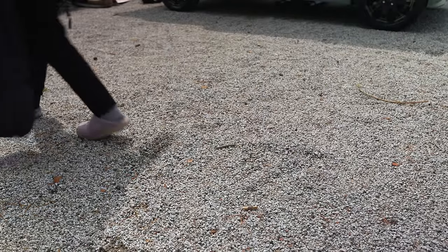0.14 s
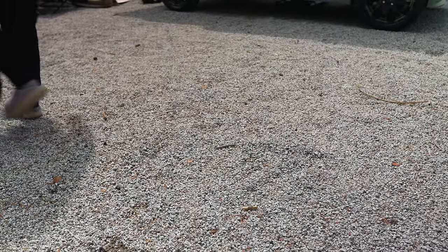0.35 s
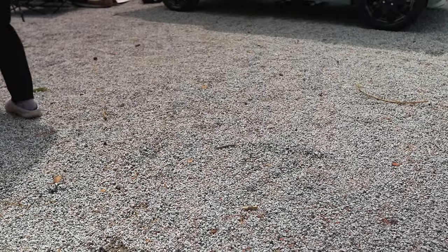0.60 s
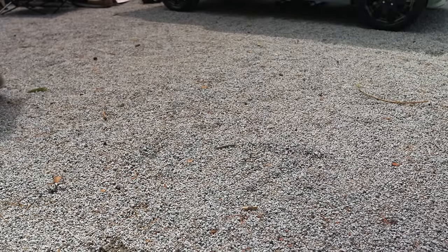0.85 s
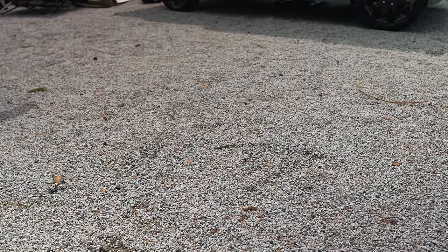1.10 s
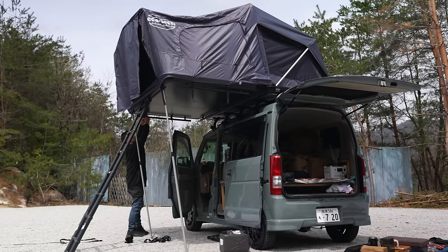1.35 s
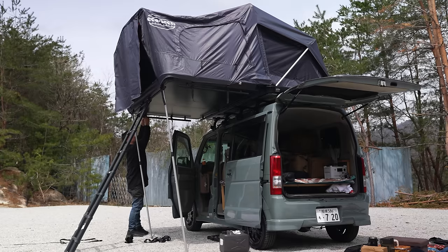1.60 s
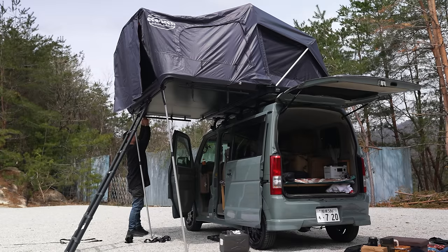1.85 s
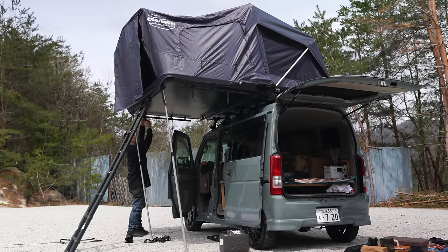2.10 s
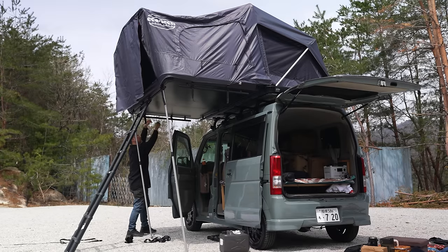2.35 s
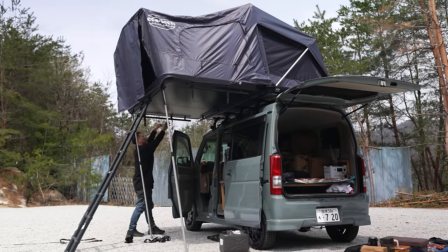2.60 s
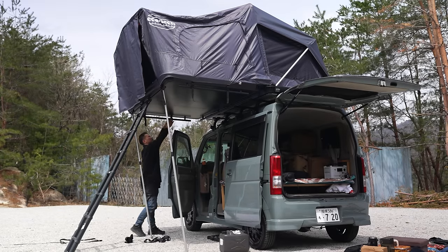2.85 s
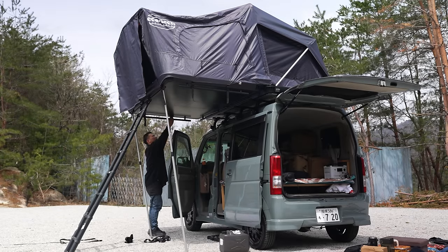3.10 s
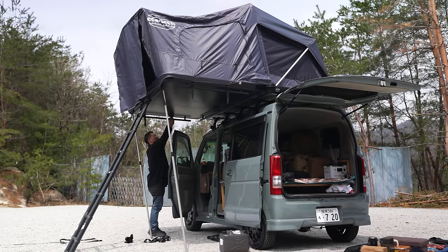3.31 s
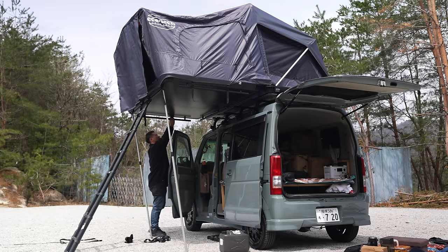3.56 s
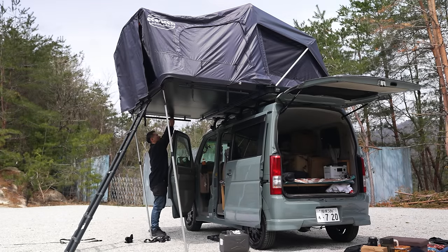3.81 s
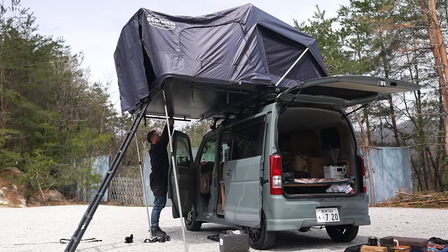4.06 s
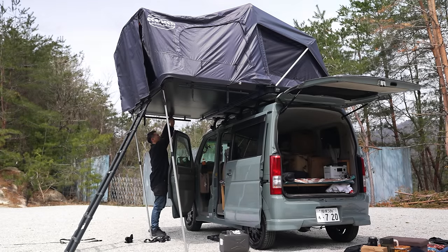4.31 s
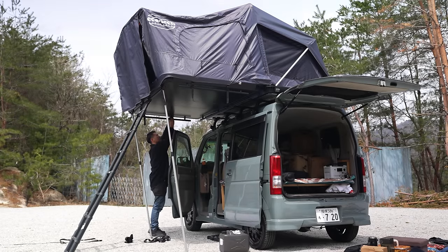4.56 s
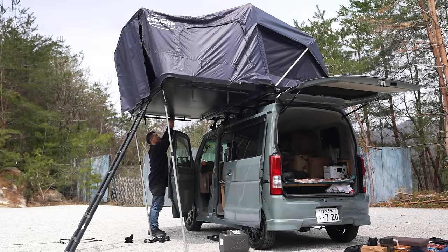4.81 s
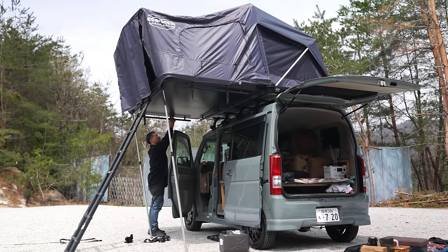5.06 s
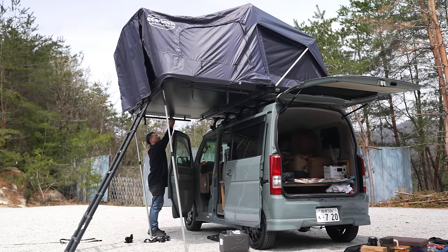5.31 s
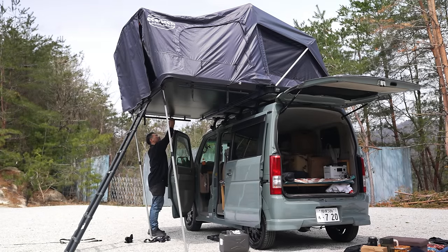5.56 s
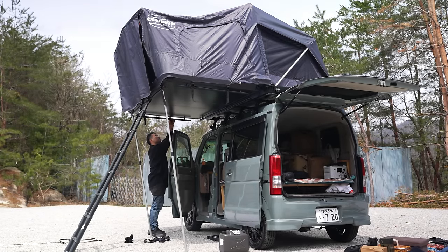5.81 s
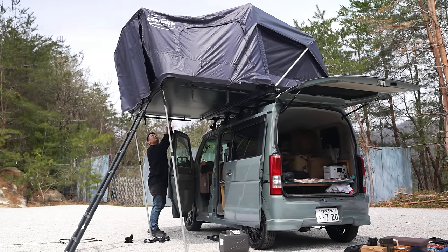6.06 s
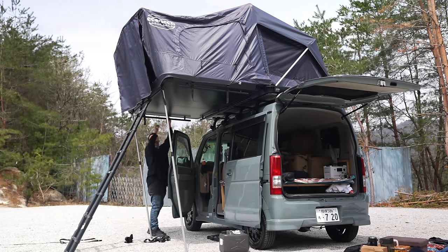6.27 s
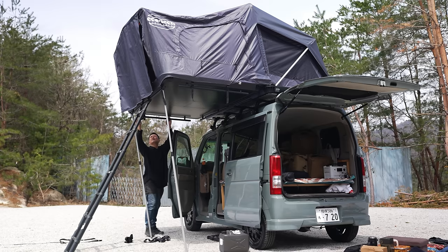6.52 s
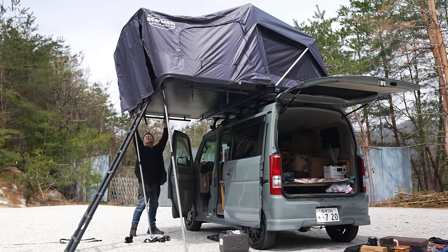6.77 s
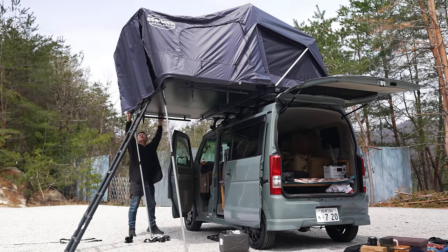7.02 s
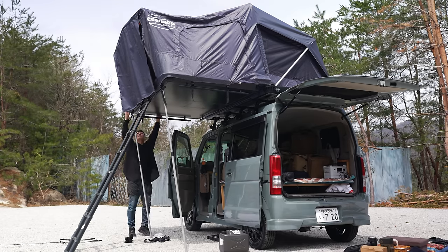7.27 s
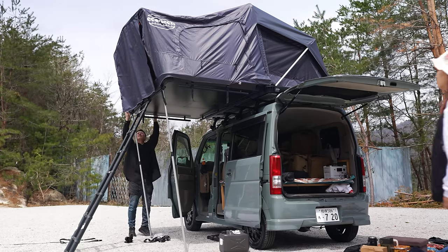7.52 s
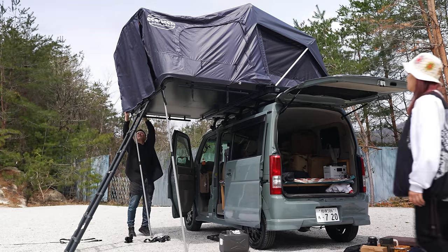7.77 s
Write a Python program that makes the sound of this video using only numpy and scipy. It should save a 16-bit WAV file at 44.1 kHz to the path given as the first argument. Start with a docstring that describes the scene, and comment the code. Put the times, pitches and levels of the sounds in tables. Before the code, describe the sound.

Gravel footsteps and a thumping bag end abruptly, followed by hollow pole knocks, tiny bright ticks, shifting stones and brief birdsong over faint outdoor hiss.

```python
"""Shoes crunch over gravel and a carried bag thumps, until a clatter is cut short at about 1.4 s.
Then hollow metal tent poles knock and ring, a small catch ticks, feet shift on the stones and birds call.
Under it all lies far air noise with a wavering low hum.
Stones, gear rattle, hiss and cracks are shaped noise; poles, bag and catch are damped sines;
birds are gliding sines."""
import sys
import numpy as np
from scipy import signal
from scipy.fft import rfft, irfft, next_fast_len
from scipy.io import wavfile
from scipy.ndimage import uniform_filter1d, map_coordinates

SR = 44100
rng = np.random.default_rng(int(sys.argv[2]) if len(sys.argv) > 2 else 0)


def put_to_file(sound):
    """Save the sound as 16-bit audio at rate SR, in the file named by the first command-line argument."""
    columns = np.atleast_2d(sound).T  # one column per channel
    safe = np.clip(columns, -1, 1)
    whole_steps = np.round(safe * 32767)
    wavfile.write(sys.argv[1], SR, whole_steps.astype(np.int16))


def ratio_of_db(decibels):
    """Turn decibels (scalar or array-like) into linear amplitude factors; 0 dB maps to 1."""
    return 10 ** (np.asarray(decibels, float) / 20)


N = 347816
TIME = np.arange(N) / SR
CUT_S = 1.4068  # the edit: earlier steps, early rattles and the clatter stop here


def unit(x):
    """Scale to rms 1."""
    return x / np.sqrt(np.mean(x ** 2) + 1e-20)


def peaked(x):
    """Scale to peak 1."""
    return x / np.abs(x).max()


def wobble(rate):
    """A smooth random curve, with rate random points a second."""
    points = rng.standard_normal(int(N * rate / SR) + 4)
    return map_coordinates(points, [TIME * rate])


def coloured(x, spectrum):
    """Give x the (Hz, dB) spectrum in place of its own, at rms 1."""
    size = next_fast_len(N + 8192)
    bins = rfft(x, size)
    hz, db = np.transpose(spectrum)
    own = np.sqrt(np.abs(uniform_filter1d(np.abs(bins) ** 2, size=1500))) + 1e-9
    bin_hz = np.fft.rfftfreq(size, 1 / SR)
    wanted = ratio_of_db(np.interp(np.log(bin_hz + 1), np.log(hz), db))
    return unit(irfft(bins / own * wanted, size)[:N])


def ring(hz, t60, length, attack):
    """A damped sine with a soft start; t60 is the time to fall 60 dB (all times in seconds)."""
    t = np.arange(int(length * SR)) / SR
    return np.sin(2 * np.pi * hz * t) * ratio_of_db(-60 * t / t60) * (1 - np.exp(-t / attack)) ** 2


def burst(t60, lo_hz, hi_hz, rise):
    """A short crack or thud: band noise that rises and dies away."""
    t = np.arange(SR // 10) / SR
    band = signal.butter(2, [lo_hz, hi_hz], "band", fs=SR, output="sos")
    noise = unit(signal.sosfilt(band, rng.standard_normal(len(t))))
    return noise * ratio_of_db(-60 * t / t60) * (1 - np.exp(-t / rise))


def add(track, s, sound):
    """Mix sound into track at s seconds."""
    part = track[round(s * SR):][:len(sound)]
    part += sound[:len(part)]


def echoes(x, t60, delay):
    """Scattered returns from the van, ground and trees: x smeared by dying noise after a delay."""
    dying = rng.standard_normal(SR // 2) * ratio_of_db(-60 * TIME[:SR // 2] / t60)
    tail = np.pad(dying, (int(delay * SR), 0))
    return signal.fftconvolve(x, tail / np.linalg.norm(tail))[:N]


# Colour of the far hiss. Each row: frequency in Hz, relative strength in dB per Hz.
AIR_SPECTRUM = [(18, -78), (30, -29), (68, -15), (93, -8), (165, -1.5), (383, -1.5), (648, -1), (720, -1),
                (1580, -5.5), (5160, -21.5), (10800, -31.5), (14800, -37), (16000, -38)]


def air():
    """Far hiss whose level drifts, and a narrow band of noise near 100 Hz that makes a wavering hum."""
    hiss = coloured(rng.standard_normal(N), AIR_SPECTRUM)
    hum = coloured(rng.standard_normal(N), [(20, -48), (75, -36), (92, -6.0), (104, 6.0), (120, -40),
                                            (200, -62), (20000, -120)])
    hiss_db = -46.5 + 0.9 * wobble(1.392)
    hum_db = -59 + 1.5 * wobble(1.5)
    return ratio_of_db(hiss_db) * hiss + ratio_of_db(hum_db) * hum


# Far calls. Each row: start in seconds, length in seconds, starting pitch in Hz, level before smearing in dB.
FAR_CALLS = [(0.175, 0.1, 4860, -41), (0.826, 0.078, 3380, -42), (2.33, 0.09, 3900, -57),
             (3.86, 0.18, 3800, -53)]


def far_birds():
    """Faint whistles deep in the wood, heard only as their smeared echoes."""
    out = np.zeros(N)
    for s, length, hz, db in FAR_CALLS:
        t = np.arange(int(length * SR)) / SR
        whistle = np.sin(2 * np.pi * hz * t * (1 + 0.22 * t))  # the pitch creeps up
        add(out, s, ratio_of_db(db) * np.hanning(len(t)) * whistle)
    return echoes(out, t60=0.22, delay=0)


# The song, one list a note. Each row of a note: time in seconds, pitch in Hz.
SONG_NOTES = [
    [(4.095, 5140), (4.111, 6470), (4.125, 5920), (4.148, 5860), (4.155, 4830), (4.172, 4550),
     (4.182, 5680), (4.188, 4810), (4.196, 4320), (4.203, 4930), (4.21, 4400), (4.26, 4080)],
    [(4.334, 4000), (4.352, 5500), (4.365, 5000), (4.38, 4720), (4.398, 4810), (4.411, 5340)],
    [(4.438, 8360), (4.442, 7300), (4.448, 6700), (4.454, 7670), (4.464, 5740), (4.471, 7120),
     (4.477, 4400), (4.484, 2760)],
]
# How each note changes in loudness. Each row: first level in dB, last level in dB.
NOTE_SWELLS = [(-50, -34.5), (-41, -30), (-31, -33)]


def bird():
    """Gliding whistles that linger among the trunks: sines that follow the drawn pitch lines."""
    edge_s = 0.0086  # fade at both ends of a note
    out = np.zeros(N)
    for note, swell_db in zip(SONG_NOTES, NOTE_SWELLS):
        times, pitches = np.transpose(note)
        hz = uniform_filter1d(np.interp(TIME, times, pitches), size=90)
        start, end = times[0], times[-1]
        edge = np.clip(np.minimum(TIME - start, end - TIME) / edge_s, 0, 1)
        level = ratio_of_db(np.interp(TIME, [start, end], swell_db))
        out += edge * level * np.sin(2 * np.pi * np.cumsum(hz) / SR)
    return out + ratio_of_db(-10.0) * echoes(out, t60=0.45, delay=0.014)


# Thumps of the bag. Each row: start in seconds, level in dB.
BAG_THUMPS = [(0.488, -16.5), (0.983, -30), (7.078, -41.5)]
# Ways the bag vibrates. Each row: pitch in Hz, level relative to the thump in dB, time to fall 60 dB in seconds.
BAG_MODES = [(85.8, -7, 0.77), (102, 1.5, 0.53), (163, -10, 0.3), (294, 7.5, 0.079), (355, 9, 0.089)]


def bag():
    """The soft load swings against a leg: low damped modes, of which the close pair beats."""
    rise_cycles = 0.77  # each mode swells over about this many of its own cycles
    out = np.zeros(N)
    for s, db in BAG_THUMPS:
        for hz, mode_db, t60 in BAG_MODES:
            add(out, s, ratio_of_db(db + mode_db) * ring(hz, t60, .6, rise_cycles / hz))
    return out


def clatter():
    """A first touch rumbles, then the blow: broad noise over a dull thud, stopped by the cut."""
    touch_s, blow_s, blow_hold_s = 1.3845, 1.398, .003
    touch_db, blow_db, after_db = (-32, -28), (-6, -10), (-42, -20.5)  # (sharp, dull)
    stage = np.digitize(TIME, [touch_s, blow_s, blow_s + blow_hold_s, CUT_S])
    gains = np.pad(ratio_of_db(np.array([touch_db, blow_db, after_db])), ((1, 1), (0, 0)))  # silent before and after
    sharp_gain, dull_gain = uniform_filter1d(gains[stage].T, size=24, axis=1)
    sharp = coloured(rng.standard_normal(N), [(300, -13.0), (3000, 0), (9000, -2.5), (15500, -5.0), (16200, -66)])
    dull = coloured(rng.standard_normal(N), [(20, -22), (250, 0), (700, -2), (2000, -12), (6000, -40)])
    return sharp_gain * sharp + dull_gain * dull


# Ticks of the catch. Each row: start in seconds, peak level in dB, base pitch in Hz.
CATCH_TICKS = [(1.671, -22, 6460), (2.1066, -35, 10800), (2.268, -25, 9350), (2.4618, -25, 9200),
               (2.6547, -24, 9700), (2.8533, -23.5, 9930), (3.2897, -27, 6600), (3.485, -26, 9500),
               (3.7309, -25, 9300), (3.9604, -33, 9630), (4.155, -23, 5950), (4.5985, -24.5, 9250),
               (4.8888, -36, 7800), (6.2597, -32, 10800), (6.49, -33, 10900), (6.5337, -29.5, 9720)]


def catch():
    """A bright, very short tick of three damped partials, with a brief rattle of echoes behind it."""
    partials = [(0.98, 0.59, 0.0012), (0.7, 0.41, 0.0012), (1.42, 0.23, 0.0014)]  # (times base pitch, share, t60 s)
    out = np.zeros(N)
    for s, db, hz in CATCH_TICKS:
        tick = sum(share * ring(ratio * hz, t60, .01, .0001) for ratio, share, t60 in partials)
        add(out, s, ratio_of_db(db) * peaked(tick))
    return out + ratio_of_db(-6.0) * echoes(out, t60=0.044, delay=0.0016)


# Knocks on the poles. Each row: time in seconds, peak level of the tone in dB, pitch of the air column in Hz,
# time to fall 60 dB in seconds, crack level relative to that peak in dB.
POLE_KNOCKS = [(1.892, -16.5, 519, 0.096, -4.5), (1.907, -2.5, 730, 0.027, -3),
               (3.072, -31.5, 623, 0.039, -8), (3.114, -24, 616, 0.019, -7), (3.219, -27, 604, 0.048, -7),
               (3.253, -28.5, 575, 0.051, -15), (3.34, -29, 598, 0.029, -11), (3.356, -36, 620, .041, -5),
               (3.373, -28, 605, .03, -8), (3.417, -29, 597, .048, 1), (3.446, -13, 610, 0.017, -16),
               (3.464, -27.5, 627, .063, -15), (3.523, -30, 590, 0.03, -8), (3.738, -30, 606, 0.054, 0),
               (3.972, -7, 603, 0.02, -7.5), (4.004, -24.5, 646, 0.047, -2), (4.025, -19, 580, 0.025, -8),
               (4.139, -23.5, 552, 0.18, 0.5), (4.172, -11, 543, 0.11, 1), (4.199, -17.5, 555, 0.071, -5),
               (4.226, -16, 582, 0.053, -6), (4.249, -20.5, 556, 0.064, -6), (4.244, -20, 332, 0.05, -4),
               (4.377, -29.5, 443, .031, 5), (4.515, -33, 560, 0.21, -3), (4.544, -22, 580, 0.024, -5),
               (4.568, -27, 536, .049, -15), (4.821, -32, 655, 0.065, 4), (4.892, -32.5, 540, .05, -6),
               (5.095, -28.5, 643, .035, -1), (5.124, -28, 564, 0.039, -16), (5.155, -31, 550, 0.043, -16),
               (5.287, -35.5, 567, 0.063, -12), (5.565, -32.5, 603, 0.1, -20),
               (5.599, -31, 580, 0.035, -16), (5.662, -27.5, 572, 0.29, -19), (5.698, -13, 570, 0.057, -11),
               (5.711, -13, 544, 0.12, -7), (5.734, -3.5, 558, 0.031, -9.5),
               (7.862, -19.5, 580, 0.049, 6.5)]
# Metal on metal. Each row: start in seconds, lowest mode level in dB, upper modes level in dB,
# crack level in dB, struck place along the pole from 0 to 1.
POLE_CLANGS = [(1.907, -42, -22, -16.5, 0.3), (5.7, -45, -43, -36, 0.4), (5.731, -17, -25.5, -20.5, 0.4),
               (7.863, -8, -18, -10.5, .255)]
# Ways the pole wall rings. Each row: pitch in Hz, level relative to the upper modes level in dB
# (not used for the first row, the lowest mode), time to fall 60 dB in seconds.
WALL_MODES = [(552.7, 0, 0.69), (1071, -4, 0.17), (1690, 2, 0.06), (2244, 5.5, 0.12), (2950, 8, 0.04),
              (3600, 7, 0.028), (4270, 6, 0.027), (4840, -19.5, 0.054), (6700, -3, 0.087),
              (6930, -7, 0.078), (7180, 8, 0.048), (8200, -6, 0.014), (8070, 13, 0.045)]


def poles():
    """A knock swells in the air column over a thud and crack; a clang rings wall modes set by the struck place."""
    thud_db = -8  # relative to the peak of a knock
    out = np.zeros(N)
    for s, db, hz, t60, crack_db in POLE_KNOCKS:
        add(out, s - .003, ratio_of_db(db) * peaked(ring(hz, max(t60, .01), .3, 0.0035)))
        add(out, s - .002, ratio_of_db(db + thud_db) * burst(0.093, lo_hz=188, hi_hz=570, rise=0.0068))
        add(out, s, ratio_of_db(db + crack_db) * burst(.032, lo_hz=740, hi_hz=2230, rise=0.0035))
    lowest_hz, _, lowest_t60 = WALL_MODES[0]
    for s, low_db, upper_db, crack_db, place in POLE_CLANGS:
        add(out, s, ratio_of_db(crack_db) * burst(0.032, lo_hz=2000, hi_hz=7800, rise=0.00066))
        add(out, s, ratio_of_db(low_db) * ring(lowest_hz, lowest_t60, .5, .001))
        for hz, db, t60 in WALL_MODES[1:]:
            waves = 6 * np.sqrt(hz / lowest_hz)  # bending waves along the pole grow as the root of pitch
            tone = ring(hz, t60, .12, .0007)
            slow_noise = unit(uniform_filter1d(rng.standard_normal(len(tone)), size=200))
            flutter = unit(1.76 + slow_noise)  # loose joints
            add(out, s, ratio_of_db(upper_db + db) * np.sin(np.pi * waves * place) * flutter * tone)
    return out + ratio_of_db(-18) * echoes(out, t60=0.22, delay=.006)


def grains(count, size, hz, spread, cycles, scatter_db):
    """Small knocks at random times: short damped sines of log-normal pitch, a few much louder."""
    start = rng.integers(0, N, count)
    pitch = hz * np.exp(spread * rng.standard_normal(count))
    loudness = ratio_of_db(scatter_db * np.minimum(rng.exponential(1, count), 5))
    turns = np.clip(pitch, 100, 16000)[:, None] * np.arange(size) / SR
    shapes = loudness[:, None] * np.sin(2 * np.pi * turns) * np.exp(-turns / cycles)
    places = start[:, None] + np.arange(size)
    return unit(np.bincount(places.ravel(), shapes.ravel(), minlength=N)[:N])


def weight(s, hold):
    """Envelope of a load that lands fast, holds and settles slowly; the cut stops the early ones."""
    land_s, settle_db_per_s = 0.0098, 155
    landing = 1 - (s > 0) * np.exp(-np.maximum(TIME - s, 0) / land_s)  # a step at 0 s is already down
    settling = ratio_of_db(-settle_db_per_s * np.maximum(TIME - s - land_s - hold, 0))
    return landing * settling * ((s > CUT_S) | (TIME < CUT_S))


# Feet landing or shifting. Each row: start in seconds, hold in seconds, crunch level in dB,
# then grit level and sand level, both relative to the crunch in dB.
FOOTSTEPS = [(0, 0.088, -27, -9, -17.5), (0.111, 0.16, -26.5, -7, -17.5), (0.308, 0.079, -38, 3.5, -1.5),
             (.44, 0.19, -32, -7.5, -14), (0.634, 0.13, -24, -8, -18.5), (.78, 0.035, -26, -6, -8),
             (.84, 0.023, -37.5, -15, 0.5), (.92, 0.31, -34.5, -9.5, -12.5), (1.14, 0.094, -29, -13, -22),
             (1.208, 0.061, -28.5, -5, -14.5), (1.3, .1, -39.5, -3, -4), (1.41, 0.036, -42, -28, -36),
             (1.93, 0.26, -42, -13, -23), (2.639, 0.23, -32, -21, -20.5), (2.95, 0.24, -41.5, -24, -25),
             (3.129, 0.047, -24.5, -25, -17.5), (3.21, 0.065, -37.5, -33, -32),
             (3.34, 0.16, -42.5, -16, -25), (4.14, 0.067, -41, -5, -18), (4.3, 0.082, -43.5, -7, -24),
             (4.5, 0.092, -43.5, -7, -23), (4.72, 0.4, -47.5, -17, -25), (5.058, 0.013, -35.5, -11, -20),
             (5.85, .13, -44, -23, -28), (6.01, .06, -35, -30, -29), (6.089, 0.086, -27, -26, -29.5),
             (6.25, 0.19, -38.5, -34, -24), (6.5, 0.55, -42.5, -28, -21), (6.808, 0.011, -30, -18, -13.5),
             (6.86, 0.27, -33.5, -14.5, -21.5), (7.137, .001, -35.5, -2, -20),
             (7.191, 0.096, -28.5, -20.5, -13.5), (7.33, 0.18, -30, -20, -15),
             (7.52, 0.14, -24, -22.5, -20.5), (7.68, 0.14, -31.5, -14.5, -18)]
# Faint stirring between steps, one row: crunch, grit, sand and low rattle levels in dB.
STIRRING_DB = -52.5, -60, -68, -51.5
# Spells of extra low rattle from the gear, often along with a step or knock.
# Each row: start in seconds, hold in seconds, level in dB.
RATTLE_SPELLS = [(1.02, .03, -37), (1.904, 0.015, -30), (3.128, 0.034, -34), (4.17, 0.034, -31),
                 (4.833, 0.1, -44.5), (5.696, 0.032, -45), (7, 0.12, -34.5), (7.18, 0.072, -29.5)]


def footfalls():
    """Gain of crunch, grit, sand and low gear rattle, summed by power over all steps and rattle spells."""
    rattle_db = -12  # relative to the crunch
    power = np.tile(ratio_of_db(np.array(STIRRING_DB))[:, None] ** 2, N)
    for s, hold, db, grit_db, sand_db in FOOTSTEPS:
        levels = ratio_of_db(db + np.array([0, grit_db, sand_db, rattle_db]))
        power += (levels[:, None] * weight(s, hold)) ** 2
    for s, hold, db in RATTLE_SPELLS:
        power[-1] += (ratio_of_db(db) * weight(s, hold)) ** 2
    return np.sqrt(power)


# Colours of three gravel layers and the low hollow rattle of the carried poles and gear.
# Each row: frequency in Hz, relative strength in dB per Hz.
CRUNCH_SPECTRUM = [(240, -45), (400, -17), (540, -38), (587, 3), (1600, 4), (2190, -5), (2380, -4.5),
                   (4440, -29), (7000, -37), (9100, -60), (15400, -120)]
GRIT_SPECTRUM = [(1760, -7.5), (3000, -1.5), (4340, -7.5), (5350, -10), (8000, -21), (10400, -35),
                 (17600, -120)]
SAND_SPECTRUM = [(4710, -17.5), (8000, -3.5), (11500, -0.5), (15100, -7), (16000, -9)]
RATTLE_SPECTRUM = [(88, -62), (150, -16), (268, -10.5), (319, -7), (389, -5), (493, -4), (588, -6.5),
                   (751, -16.5), (1000, -13), (1300, -46), (2200, -120)]
# The loudest single stones snapping. Each row: start in seconds, peak level of the tone in dB, pitch in Hz,
# treble noise level relative to that peak in dB.
STONE_SNAPS = [(0.008, -8.5, 1570, -24), (0.031, -12, 1570, -12), (0.062, -7.5, 1620, -18),
               (0.217, -8.5, 1360, -15), (0.254, -13, 1190, -16), (0.289, -10, 1070, -22),
               (0.384, -29, 923, -6), (0.455, -16.5, 1210, -13), (0.654, -9.5, 1480, -10),
               (0.689, -8.5, 2000, -15), (0.897, -33, 1550, -3), (0.938, -32, 953, -20),
               (0.974, -24, 1230, -16), (1.058, -20, 1860, -16), (1.111, -15.5, 1720, -13),
               (1.173, -27, 1140, -16), (1.238, -12, 1580, -22), (1.613, -30, 2050, -12),
               (1.638, -34, 1420, -6), (1.678, -26.5, 2000, -9), (1.745, -27, 1450, -13),
               (2.716, -9.5, 1260, -30), (2.895, -17, 1220, -28), (2.992, -26, 945, -22),
               (3.035, -19.5, 1180, -27), (3.601, -19.5, 1300, -25), (3.752, -27.5, 1180, -21),
               (4.172, -9.5, 1220, -21), (4.761, -24, 1180, -30), (4.823, -23, 1350, -26),
               (6.019, -22, 1180, -24), (6.111, -15, 1290, -31), (6.124, -8.5, 1290, -35),
               (6.134, -4.5, 1320, -36), (6.147, -10, 1310, -36), (6.195, -10.5, 1060, -31),
               (6.944, -18.5, 1100, -15), (6.985, -24, 1250, -22), (7.119, -22, 1280, -12),
               (7.14, -20.5, 1240, -9), (7.543, -12.5, 1410, -21), (7.611, -7.5, 1380, -19),
               (7.707, -11.5, 1890, -26), (7.769, -17, 1910, -24), (7.786, -16, 1430, -18),
               (7.812, -23.5, 1500, 2)]


def gravel_and_gear():
    """Coarse stones grind, grit hisses in the same clumps, sand partly in its own; carried poles and gear rattle."""
    crunch, grit, sand, rattle = footfalls()
    clumps = wobble(35) + 0.53 * wobble(110)
    coarse = grains(count=15000, size=200, hz=1356, spread=0.6, cycles=0.94, scatter_db=2.5)
    coarse += 0.66 * rng.standard_normal(N)
    fine = grains(count=12000, size=30, hz=8040, spread=0.7, cycles=0.091, scatter_db=3.5)
    fine += 1.34 * rng.standard_normal(N)
    hollow = grains(count=5000, size=500, hz=509.4, spread=0.343, cycles=2.65, scatter_db=0.5)
    hollow += 0.55 * rng.standard_normal(N)
    out = crunch * unit(ratio_of_db(1.75 * clumps) * coloured(coarse, CRUNCH_SPECTRUM))
    out += grit * unit(ratio_of_db(1.53 * clumps) * coloured(fine, GRIT_SPECTRUM))
    out += sand * unit(ratio_of_db(1.3 * clumps + 2.2 * wobble(45)) * coloured(fine, SAND_SPECTRUM))
    out += rattle * unit(ratio_of_db(1.5 * clumps) * coloured(hollow, RATTLE_SPECTRUM))
    for s, db, hz, treble_db in STONE_SNAPS:
        add(out, s, ratio_of_db(db) * peaked(ring(hz, 0.0078, .02, 0.00011)))
        add(out, s, ratio_of_db(db + treble_db) * burst(0.0058, lo_hz=2160, hi_hz=11500, rise=.0001))
    return out


def scene():
    """Everything reaches one microphone."""
    background = air() + far_birds() + bird()
    objects = bag() + clatter() + catch() + poles()
    return (background + objects + gravel_and_gear())[None]


def top_cut(x):
    """Nothing passes above the cut-off."""
    return signal.sosfilt(signal.butter(12, 16120, fs=SR, output="sos"), x)


def record(dry):
    """The microphone cuts deep bass, below 60 Hz; the loudest blows clip at full scale."""
    bass_cut = signal.butter(2, 60, "high", fs=SR, output="sos")
    mix = np.clip(signal.sosfilt(bass_cut, dry), -1, 1)
    return top_cut(mix)


dry = scene()
out = record(dry)
put_to_file(out)
```